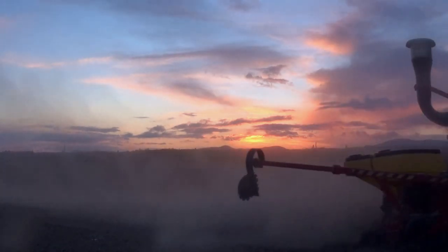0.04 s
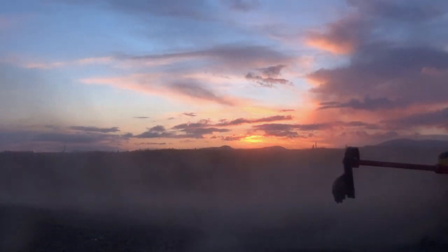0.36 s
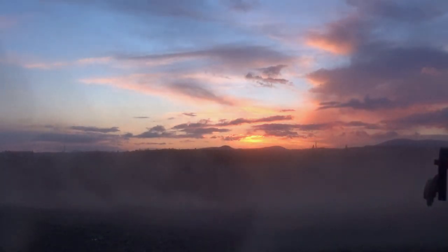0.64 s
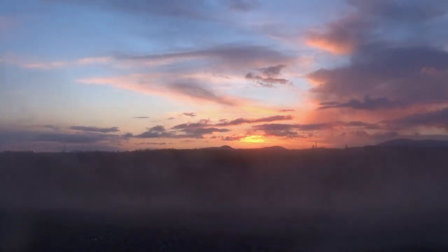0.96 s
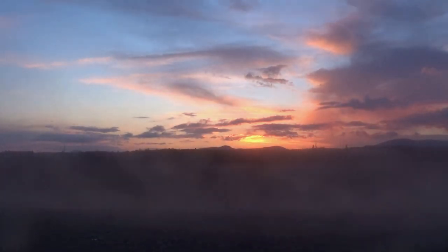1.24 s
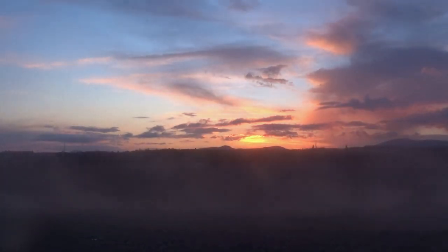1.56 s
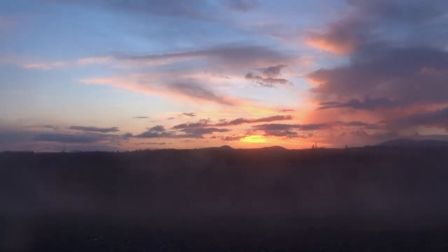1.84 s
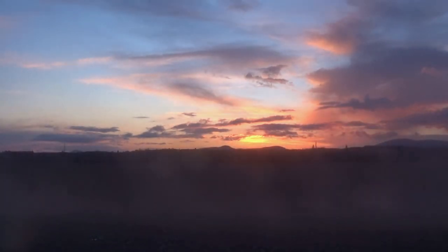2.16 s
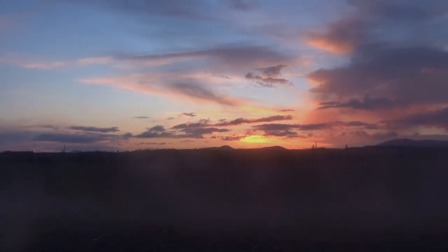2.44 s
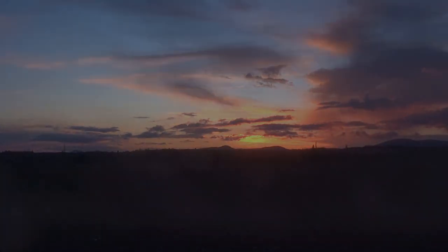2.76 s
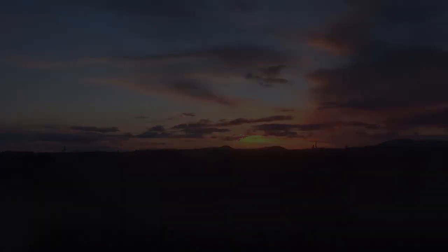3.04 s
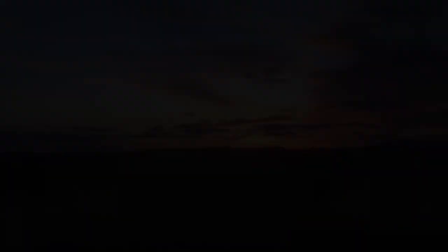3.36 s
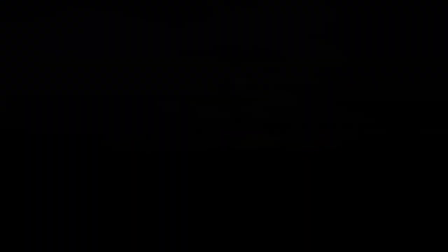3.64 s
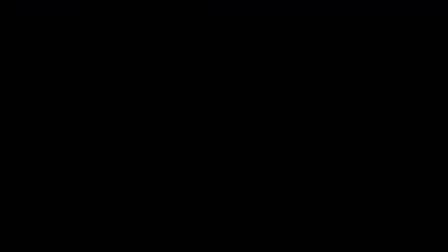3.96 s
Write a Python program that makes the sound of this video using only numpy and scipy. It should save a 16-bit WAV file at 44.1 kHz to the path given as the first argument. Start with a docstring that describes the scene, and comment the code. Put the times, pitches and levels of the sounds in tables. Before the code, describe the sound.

A tractor roars close by with a wavering whine, then fades as it moves away.

```python
"""A broad roar with a wavering whine, close by and right of the microphone: a tractor's engine and fan. It
pulls a pneumatic planter away across a field, and the sound fades with distance. The planter's frame rattles,
small parts jingle, grit ticks on metal, dry joints squeak, thin whining tones glide and metal scrapes in the
soil. Late on, puffs of wind touch the microphone."""
import sys
import numpy as np
from scipy import signal
from scipy.fft import rfft, irfft
from scipy.io import wavfile
from scipy.ndimage import uniform_filter1d

SR = 44100
rng = np.random.default_rng(int(sys.argv[2]) if len(sys.argv) > 2 else 0)


def to_wav(s):
    """Save 16-bit WAV."""
    ch = np.atleast_2d(s).T  # columns
    pcm = np.round(np.clip(ch, -1, 1) * 32767)  # PCM
    wavfile.write(sys.argv[1], SR, pcm.astype(np.int16))


N = 176400

# Seconds at which the machine is at four distances from the microphone: near, halfway, further, far.
DISTANCE_TIMES = [.35, 1.55, 2.5, 3.6]
# Engine speed. Each row: time in seconds, shaft turns per second.
SHAFT_SPEED = [(0, 41.9), (.4, 42.1), (.6, 42.5), (.95, 41.0), (1.25, 42.0), (1.5, 41.8), (1.8, 42.3),
               (2.2, 41.9), (2.55, 42.15), (2.85, 41.3), (3.1, 41.9), (3.35, 41.65), (3.7, 42.0), (4, 41.7)]
WAVER_DEPTH, WAVER_HZ = .16, 14  # unsteadiness of whine and hum


def roar(firings_per_turn=3, throb=.03, bass_edge_hz=460):
    """Rushing air and engine noise, throbbing with the firings and changing colour with distance."""
    # Each row: frequency in Hz, relative level in dB at the four distances.
    spectrum = [(25, -35, -40, -40, -38), (52, -39, -44, -40, -31), (107, -12, -14, -15, -11.5),
                (216, -7, -11.5, -6.5, -7), (311, 3, 2, -0.5, -1), (388, 3.5, 3, 2.5, 1.5),
                (497, -1, -2.5, 0, -1.5), (577, -1, -3.5, -5, -5), (664, 0, -2, -1, 1.5),
                (920, 0.5, 0, 0, -.5), (1280, -4, -3.5, -4.5, -3), (1450, -1.5, -2.5, -1.5, -2.5),
                (2400, -6, -5.5, -3.5, -4), (2980, -1.5, -2, -1, -2), (3700, -4.5, -5.5, -3.5, -3.5),
                (4170, -5.5, -8, -7, -9.5), (4640, -7, -8, -6.5, -10.5), (5700, -8.5, -9, -5.5, -6.5),
                (6180, -13, -8, -9, -10), (7040, -11.5, -15.5, -19, -25.5), (7550, -14, -18, -13, -11.5),
                (8970, -19, -12.5, -15, -16), (9300, -16.5, -12.5, -9, -9.5),
                (10460, -22.5, -18.5, -18.5, -20), (12100, -28.5, -25, -26, -26.5),
                (13100, -38, -29, -29, -35), (14900, -45, -48, -50, -50)]
    # Each row: frequency in Hz, left minus right in dB at the four distances.
    balance = [(100, 2, 0, 0, -1), (385, -2.5, -3, -1.5, -0.5), (900, -6.5, -12, -12.5, -12.5),
               (2050, -5.5, -7, -6.5, -5), (3200, -4, -6.5, -8, -9), (4220, -2.5, -9, -12.5, -12),
               (5860, -4, -15.5, -10, -9), (7040, -2, -14, -7, -3), (8140, -17, 2, 7, 14),
               (8900, 22, 4, 3, 2), (9900, 1.5, -1, 1, -0.5)]
    # Each row: frequency in Hz, left's phase lead in radians at the four distances.
    left_lead = [(60, 0.96, 0.6, -2.3, 0.4), (550, 0.4, -0.03, .25, -0.7), (1200, 0.75, 1, 1.3, 1.24),
                 (1780, 0.53, 1.2, 1.2, 2), (2500, 0.4, 0.92, 0.63, 0.5), (3900, -0.1, 0.44, 0.6, 1),
                 (5600, 0.1, 1, 1.5, 1.4), (6340, 0.17, 2.3, 4.5, 4), (7540, -1, -2.4, -3, -3),
                 (8800, 0, 0, 0, 0)]
    # Each row: frequency in Hz, likeness of left and right from 0 to 1.
    coherence = [(60, 0.49), (140, 1), (300, 0.98), (1000, 0.86), (2500, 0.95), (6000, 0.95), (8000, 0.87),
                 (10500, 1)]
    # Each row: time in seconds, bass against the rest in dB.
    bass_swing = [(0, 0.5), (1.0, 0.2), (1.42, 1.5), (1.65, -2), (1.9, -2), (2.1, 0), (2.28, -2), (2.6, -1),
                  (2.9, 2), (3.3, -0.5), (4, -0.5)]
    hz, t = np.fft.rfftfreq(1024, 1 / SR), np.arange(N // 256 + 5) * 256 / SR
    a, b, c, d, patches = rng.standard_normal((5, len(hz), len(t)))
    patch_db = smoothed(patches, 22, 9)
    flicker_db = .6 * smoothed(rng.standard_normal(len(t)), 3)
    swell_db = .15 * smoothed(rng.standard_normal(len(t)), 12)
    ripple_db = .9 * smoothed(rng.standard_normal(a.shape), 2, 110)  # narrow resonances come and go
    likeness = np.clip(at_frequency(coherence, hz).T, 0, 1)
    right = a + 1j * b
    left = likeness * right + np.sqrt(1 - likeness ** 2) * (c + 1j * d)
    left *= np.exp(1j * at_distance(left_lead, hz, t))
    ratio = amp(at_distance(balance, hz, t))
    pair = np.array([left * ratio, right]) / np.sqrt(1 + ratio ** 2)
    colour = amp(at_distance(spectrum, hz, t) + ripple_db)
    colour /= np.sqrt((colour ** 2).mean(0))
    colour *= amp(curve(bass_swing, t) / (1 + (hz[:, None] / bass_edge_hz) ** 10))
    treble_share = np.minimum(hz / 1500, 1)[:, None]
    unrest = amp(patch_db + (flicker_db + swell_db) * treble_share)
    air = signal.istft(pair * colour * unrest, nperseg=1024, noverlap=768)[1][:, :N]
    firings = firings_per_turn * np.cumsum(curve(SHAFT_SPEED, np.arange(N) / SR)) / SR
    return unit_rms(air) * (1 + throb * np.cos(2 * np.pi * firings))


def whine(jitter=.0025, left_db=-8, left_lead_rad=.61):
    """Multiples of the shaft speed, each wavering on its way through the air to the microphone."""
    # Each row: multiple of the shaft speed, relative level in dB at the four distances.
    orders = [(9, -16, -15, -15, -16), (10, -8, -14, -12, -13), (21, 0, 0, 0, 0), (24, -12, -14, -13, -15),
              (42, -10, -11, -14, -13)]
    # Each row: time in seconds, level against the roar in dB.
    level = [(0, -15), (.19, -19), (.34, -16), (.43, -7), (.57, -9), (.72, -18), (1.0, -13), (1.15, -14),
             (1.22, -4), (1.32, -4), (1.5, -10), (1.58, -6), (1.8, -7), (2.07, -13), (2.18, -8.5),
             (2.29, -16), (2.35, -5), (2.42, -14), (2.46, -6), (2.52, -15), (2.58, -6.5), (2.68, -6),
             (2.8, -13), (2.97, -15), (3.06, -1), (3.15, -2.5), (3.25, -12), (3.53, -6), (3.65, -8),
             (3.76, -4), (3.82, -11), (4, -13)]
    t = np.arange(N) / SR
    turns = np.cumsum(curve(SHAFT_SPEED, t) * (1 + jitter * drift(28.7))) / SR
    tone = 0
    for multiple, *db in orders:
        waver = 1 + WAVER_DEPTH * (drift(WAVER_HZ) + 1j * drift(WAVER_HZ))
        partial = np.exp(2j * np.pi * (multiple * turns + rng.random()))
        tone += amp(np.interp(t, DISTANCE_TIMES, db)) * waver * partial
    pair = np.array([tone * amp(left_db) * np.exp(1j * left_lead_rad), tone]).real
    return np.sqrt(2) * amp(curve(level, t)) * pair


def rattles(clank_db=-2, rush_db=-4.5):
    """The planter's frame clanks in quick clusters, with a rush of noise."""
    # Each row: start in seconds, length in seconds, relative level in dB.
    clusters = [(1.44, 0.05, -20), (1.693, 0.025, -21), (1.765, 0.028, -25), (2.1, 0.048, -23),
                (2.52, 0.029, -24.5), (3.02, 0.024, -26), (3.325, 0.028, -28.5), (3.37, 0.026, -29.5),
                (3.685, 0.031, -31.5), (3.74, .035, -34.5)]
    # The frame's resonances, then the colour of the rush. Each row: frequency in Hz, relative level in dB.
    frame_modes = [(870, -3), (1480, -4), (1735, -0.5), (2090, -3), (2300, -1.5), (2620, -4), (2980, 1.5),
                   (3310, -1.5), (3700, -5)]
    rush_colour = [(300, -31), (900, 2), (2200, 2), (3400, 0), (4500, -15), (9000, -25), (15000, -49)]
    force = swells(clusters)
    clanks = loose_metal(force, frame_modes, knocks_per_s=350, decay_s=.006)
    return amp(clank_db) * clanks + amp(rush_db) * noise(rush_colour) * force


def jingle():
    """Small loose parts jingle without pause while the planter is near."""
    # Each row: time in seconds, level in dB before panning.
    level = [(0, -32), (.2, -27.5), (.4, -30), (.7, -30.5), (1.1, -34), (1.35, -44), (2, -50), (4, -70)]
    # The parts' resonances. Each row: frequency in Hz, relative level in dB.
    part_modes = [(2900, -1), (3080, -2), (3420, 1), (4150, 0), (4480, 0), (4740, 1), (4920, 2)]
    force = amp(curve(level, np.arange(N) / SR))
    return loose_metal(force, part_modes, knocks_per_s=420, decay_s=.002)


def ticks(rise_s=.00017, decay_s=.0055):
    """Grit strikes metal, and the ring dies at once."""
    # Each row: start in seconds, pitch in Hz, relative level in dB.
    strikes = [(.215, 4050, -13.5), (.283, 6500, -21), (0.566, 5710, -16), (.648, 5240, -16),
               (.663, 6300, -18), (.849, 6110, -25), (.973, 6100, -27), (1.019, 8300, -25),
               (1.311, 6000, -23), (1.334, 6100, -24), (1.400, 5900, -24), (1.421, 6100, -23.5),
               (1.802, 5500, -20), (1.92, 6560, -26), (2.392, 6000, -33), (2.739, 5750, -30),
               (3.035, 5500, -29), (3.331, 5500, -28), (3.608, 5300, -31), (3.752, 5400, -32)]
    out, t = np.zeros(N), np.arange(SR // 40) / SR
    for start, hz, db in strikes:
        envelope = np.exp(-t / decay_s) - np.exp(-t / rise_s)
        add(out, start, amp(db) * envelope * rough_tone(t, hz, width_hz=670))
    return out


def squeaks(quiver_depth_hz=110, quiver_rate_hz=300):
    """Dry joints sing briefly, very high, their pitch quivering."""
    # Each row: start in seconds, length in seconds, pitch in Hz, level in dB.
    notes = [(.092, .028, 9480, -26), (.143, .025, 11450, -33), (.165, .035, 11280, -33),
             (1.224, .03, 9520, -27), (1.52, .025, 13200, -42), (1.525, .04, 11850, -39),
             (2.337, .033, 12530, -30), (2.625, .03, 9530, -28), (2.642, .025, 12450, -34),
             (2.66, .035, 12680, -39), (2.67, .07, 11400, -44), (3.165, .075, 11430, -39)]
    out = np.zeros(N)
    for start, length, hz, db in notes:
        t = np.arange(0, length, 1 / SR)
        turns = np.cumsum(hz + quiver_depth_hz * drift(quiver_rate_hz)[:len(t)]) / SR
        envelope = np.sqrt(2) * amp(db) * np.sin(np.pi * t / length)
        add(out, start, envelope * np.sin(2 * np.pi * turns))
    return out


def singing(jitter=.0035, jitter_hz=60):
    """Thin whining tones swell into a gliding note and sink back; one short, lower tone near 915 Hz at 1.27 s
    is the ring of a clank in the frame."""
    # Each row: start and length in seconds, first pitch in Hz, glide in Hz per second, relative dB.
    notes = [(-.05, .2, 843, 0, -30), (.17, .22, 837, 0, -31), (.45, .42, 839, -15, -35.5),
             (1.27, .11, 915, 150, -32), (.8, .45, 4915, 20, -40), (0, .34, 3000, 200, -31),
             (.2, .6, 2850, 25, -36), (.5, .25, 2975, 40, -34), (.55, .55, 1680, 55, -37),
             (.84, .38, 2878, 140, -31.5), (1.08, .27, 1748, 15, -36), (1.19, .15, 3192, 20, -34),
             (1.55, .39, 3110, 160, -30.5), (1.68, .24, 3525, 90, -37), (2.6, .14, 2630, 20, -38),
             (3.48, .22, 2270, 40, -46), (3.75, .3, 2975, 120, -48), (.8, 3.2, 4422, 4, -48),
             (2.0, 1.2, 8840, 20, -44), (1.2, .7, 10600, 30, -47)]
    out = np.zeros(N)
    for start, length, hz, glide, db in notes:
        t = np.arange(0, length, 1 / SR)[:N]
        pitch = (hz + glide * t) * (1 + jitter * drift(jitter_hz)[:len(t)])
        envelope = amp(db) * np.sqrt(2 * abs(np.sin(np.pi * t / length)))
        add(out, start, envelope * np.sin(2 * np.pi * np.cumsum(pitch) / SR))
    return out


def scrapes():
    """Metal drags through soil in short, gritty hisses."""
    # Each row: start in seconds, length in seconds, level in dB.
    drags = [(1.005, 0.022, -37), (2.325, 0.052, -29), (2.645, 0.057, -29.5), (3.16, .04, -37)]
    # Each row: frequency in Hz, relative level in dB.
    colour = [(3000, -24), (5500, 5), (7000, -9), (8300, 6), (10500, 1.5), (12700, -2), (15000, -32)]
    return noise(colour) * swells(drags)


def fan_hum():
    """One gliding, wavering tone of the fan, under the whine."""
    # Each row: time in seconds, pitch in Hz, level in dB before panning.
    course = [(0, 745, -43), (.4, 738, -34), (.65, 729, -33), (.85, 733, -39), (1.05, 740, -35),
              (1.3, 750, -31.5), (1.5, 761, -34), (1.7, 772, -34.5), (2.0, 777, -40), (2.2, 765, -50),
              (2.4, 757, -43), (2.5, 752, -52), (2.68, 747, -41), (2.9, 746, -52), (3.08, 746, -44),
              (3.25, 746, -52), (3.5, 747, -45), (3.7, 746, -55), (4, 745, -60)]
    times, hz, db = np.transpose(course)
    t = np.arange(N) / SR
    tone = np.sin(2 * np.pi * np.cumsum(np.interp(t, times, hz)) / SR)
    waver = 1 + WAVER_DEPTH * drift(WAVER_HZ)
    return np.sqrt(2) * amp(np.interp(t, times, db)) * waver * tone


def wind(rumble_db=-77):
    """Wind on the microphone: a faint rumble and brief puffs, separate noise on each side."""
    # Each row: start in seconds, length in seconds, level in dB.
    puffs = [(2.785, .06, -34), (2.94, .08, -33.5), (3.015, .05, -33)]
    # Each row of both colours: frequency in Hz, relative level in dB.
    puff_colour = [(25, -36), (55, -24), (75, -10), (110, -2), (170, 2), (230, -3), (320, -11), (900, -48),
                   (4000, -80)]
    rumble_colour = [(20, -17), (50, -25), (90, 9), (160, 0), (260, 2), (800, -45), (4000, -80)]
    return np.array([amp(rumble_db) * noise(rumble_colour) + noise(puff_colour) * swells(puffs)
                     for side in range(2)])


def loose_metal(force, modes, knocks_per_s, decay_s):
    """Loose metal knocks at uneven moments; each knock rings the modes in its own mix."""
    t = np.arange(SR // 20) / SR
    rate = knocks_per_s * np.maximum(1 + .5 * drift(knocks_per_s), 0)
    knocks = np.diff(np.floor(np.cumsum(rate) / SR), prepend=0)
    out = np.zeros(N)
    for hz, db in modes:
        mode = amp(db) * np.exp(-t / decay_s) * np.sin(2 * np.pi * hz * t)
        out += signal.oaconvolve(force * knocks * rng.uniform(-1, 1, N), mode)[:N]
    return unit_rms(out) * np.sqrt(np.mean(force ** 2))


def rough_tone(t, hz, width_hz, size=16384):
    """Noise in one narrow resonance, rms 1."""
    resonance = np.exp(-((np.fft.rfftfreq(size, 1 / SR) - hz) / width_hz) ** 2)
    return unit_rms(irfft(rfft(rng.standard_normal(size)) * resonance)[:len(t)])


def noise(colour):
    """Steady noise of one colour, rms 1."""
    gain = amp(at_frequency(colour, np.fft.rfftfreq(N, 1 / SR))[0])
    return unit_rms(irfft(rfft(rng.standard_normal(N)) * gain, N))


def drift(hz):
    """Random wander up to about this rate, rms 1."""
    lowpass = np.exp(-(np.fft.rfftfreq(N, 1 / SR) / hz) ** 2)
    return unit_rms(irfft(rfft(rng.standard_normal(N)) * lowpass, N))


def swells(rows):
    """An envelope of short arches."""
    level = np.zeros(N)
    for start, length, db in rows:
        add(level, start, amp(db) * np.sin(np.pi * np.arange(0, length, 1 / SR) / length))
    return level


def add(mix, start_s, sound):
    """Mixes a sound in at its start time."""
    at = round(start_s * SR)
    sound = sound[max(-at, 0):]
    part = mix[max(at, 0):][:len(sound)]
    part += sound[:len(part)]


def at_distance(points, hz, t):
    """Glides through a table's four distances: frequency x time."""
    share = np.array([np.interp(t, DISTANCE_TIMES, row) for row in np.eye(len(DISTANCE_TIMES))])
    return at_frequency(points, hz).T @ share


def at_frequency(points, hz):
    """Reads each column of a spectrum table on a log-frequency axis."""
    f, *columns = np.transpose(points)
    return np.array([np.interp(np.log(hz + 1), np.log(f + 1), c) for c in columns])


def curve(points, t):
    """Reads a control curve at times t."""
    return np.interp(t, *np.transpose(points))


def smoothed(x, *widths):
    """Moving average with one width per axis, rms 1."""
    for axis, width in enumerate(widths):
        x = uniform_filter1d(x, size=width, axis=axis)
    return unit_rms(x)


def unit_rms(x):
    """Scales to rms 1."""
    return x / np.sqrt(np.mean(abs(x) ** 2) + 1e-20)


def amp(db):
    """Decibels to gain."""
    return 10 ** (np.asarray(db) / 20)


def scene():
    """Tractor and planter recede on the right; squeaks and scrapes reach both sides alike."""
    # Roar and whine fade with distance. Each row: time in seconds, level in dB.
    departure = [(0, -18), (.3, -18), (.99, -19), (1.03, -21), (1.08, -19), (1.35, -20.5), (1.65, -19.5),
                 (2.1, -21.5), (2.45, -24), (2.65, -23.5), (2.8, -25.5), (3.1, -27.5), (3.3, -29.5),
                 (3.76, -33), (3.82, -34), (4, -37)]
    tractor = (roar() + whine()) * amp(curve(departure, np.arange(N) / SR))
    pan_right = amp([[-6], [1.5]])
    planter = (ticks() + rattles() + jingle() + singing() + fan_hum()) * pan_right
    return tractor + planter + squeaks() + scrapes() + wind()


def record(dry):
    """The recorder passes nothing above its band limit."""
    lowpass = signal.firwin(511, 15400, window=("kaiser", 9), fs=SR)
    return signal.oaconvolve(dry, lowpass[None], "same")


dry = scene()
out = record(dry)
to_wav(out)
```